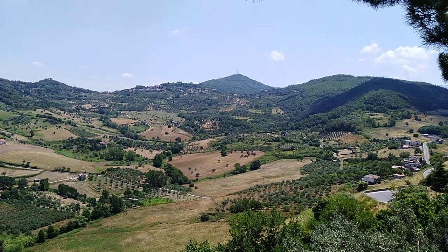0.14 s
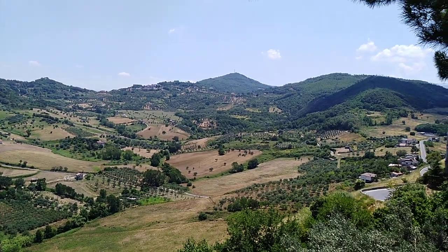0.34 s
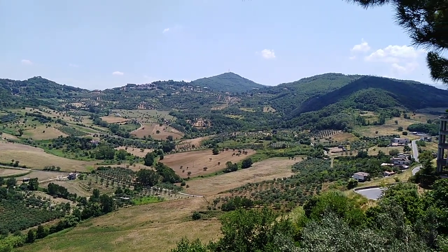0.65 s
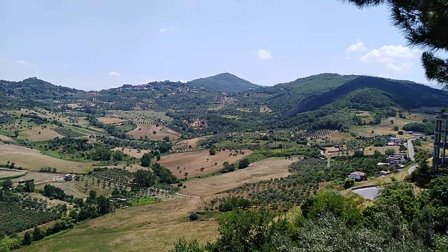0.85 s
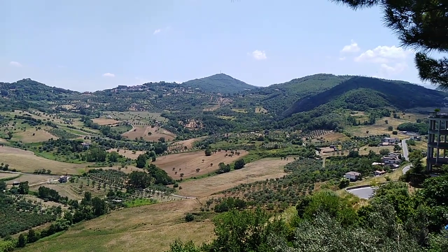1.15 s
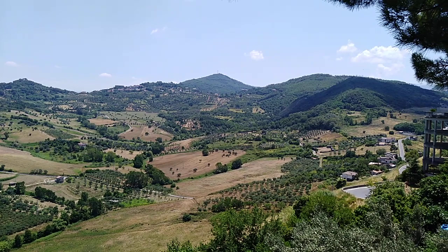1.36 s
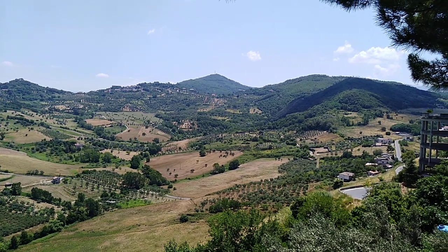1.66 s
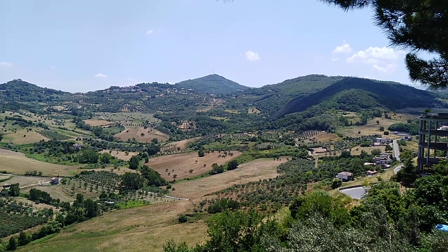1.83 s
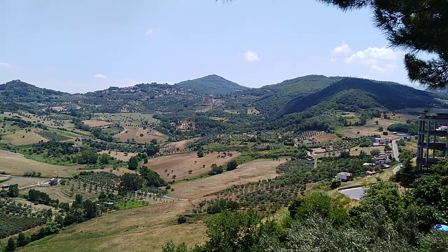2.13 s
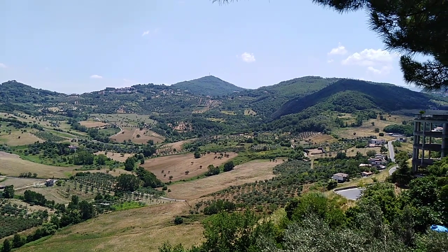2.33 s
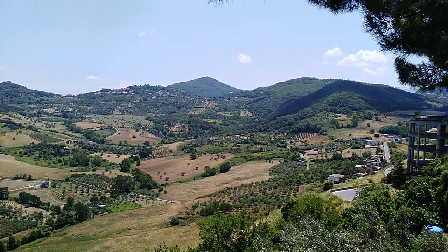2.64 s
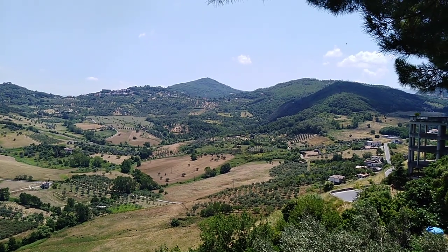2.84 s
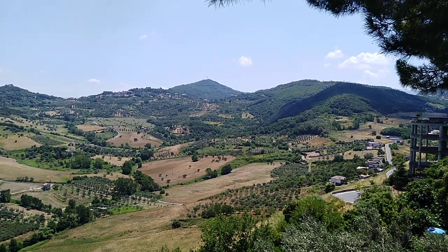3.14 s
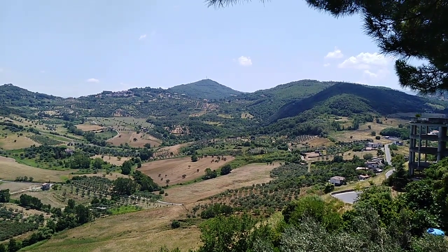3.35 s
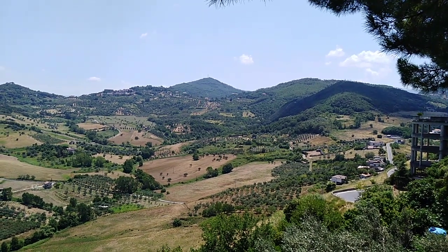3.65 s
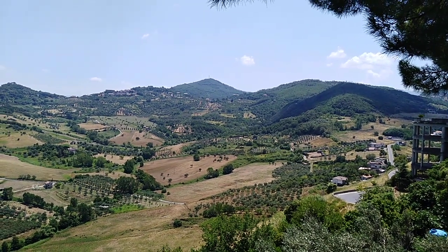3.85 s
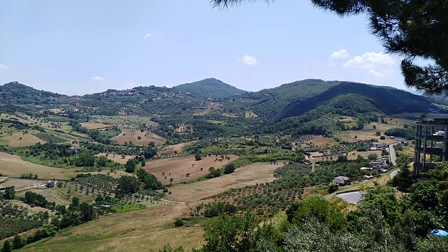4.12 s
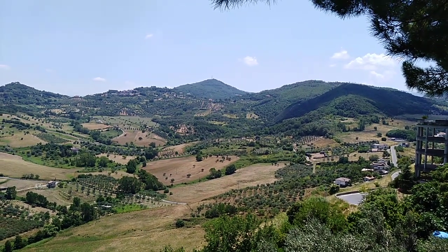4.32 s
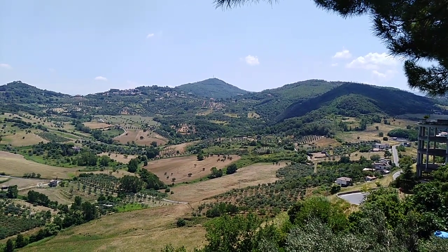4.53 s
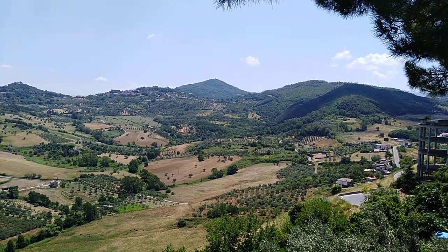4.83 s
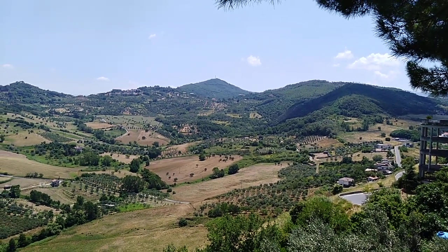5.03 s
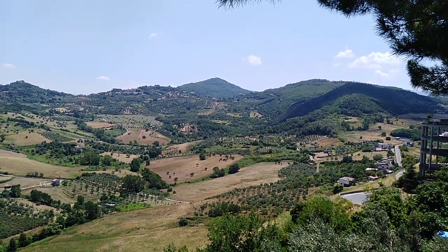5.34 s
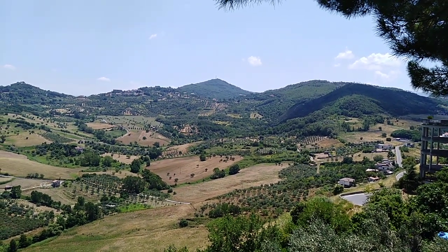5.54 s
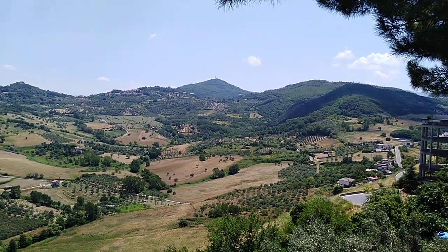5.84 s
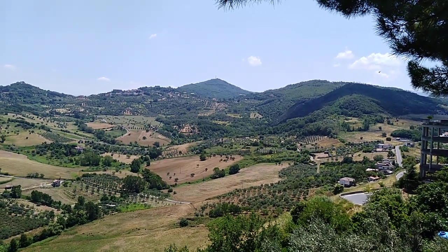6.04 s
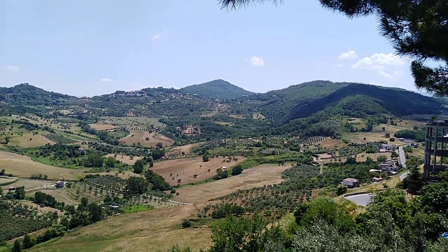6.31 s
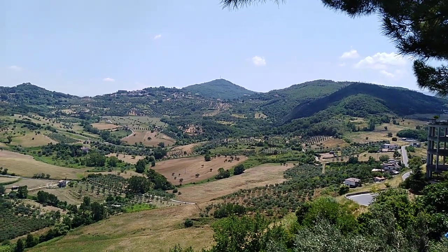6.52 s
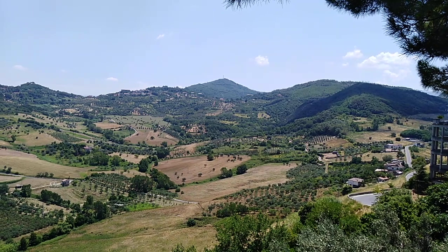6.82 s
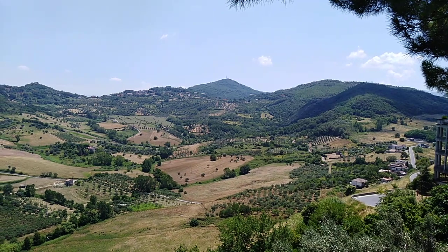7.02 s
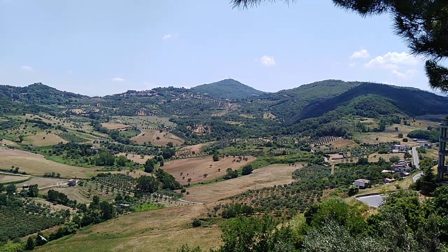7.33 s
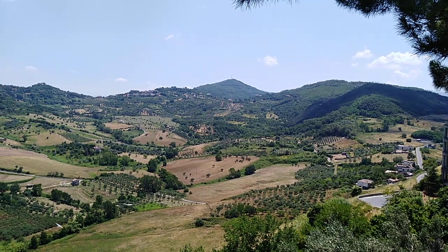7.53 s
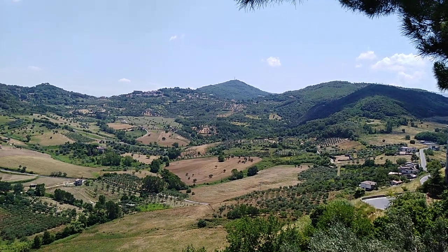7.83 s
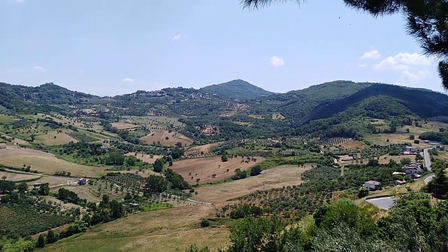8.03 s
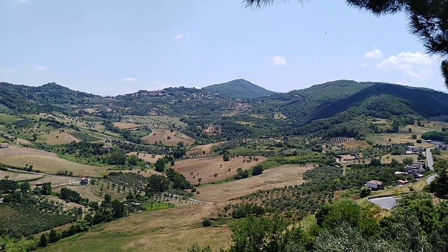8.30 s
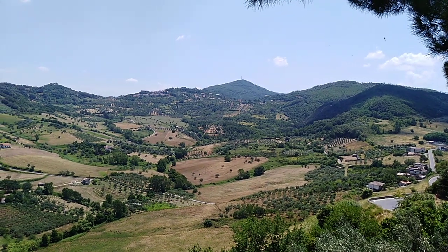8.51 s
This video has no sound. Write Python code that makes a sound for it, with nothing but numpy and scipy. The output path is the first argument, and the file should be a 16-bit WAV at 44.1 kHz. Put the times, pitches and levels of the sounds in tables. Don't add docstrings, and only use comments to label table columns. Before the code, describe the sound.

From 0 seconds a cicada very close on the right sings in bright, dry, rasping bursts, each a little over a tenth of a second, about six per second, with very short rests. A faint, blurred far chorus fills the gaps. Low wind rumble and soft thuds push on the microphone, mostly the right side, notably near 0, 1, 2.2 and 2.6 to 4.2 seconds. At about 3 seconds a second cicada begins weakly, and from 3.3 it sings steadily, slightly softer and rougher, its phrases swelling in and weaving against the first. From 4.5 seconds the wind settles to a faint rumble. The near singer leaves longer gaps or extends its buzzes around 5.5 to 7.3 seconds, then resumes regular pulsing. Faint distant wooden knocks appear near 0.5 and 1.9, with two heavier dull blows around 6.8 and 6.95 and lighter taps afterwards. The buzzing continues to the end at 8.7 seconds.

```python
import sys
import numpy as np
from scipy import signal
from scipy.fft import rfft, irfft
from scipy.io import wavfile
from scipy.ndimage import uniform_filter1d

SR = 44100
rng = np.random.default_rng(int(sys.argv[2]) if len(sys.argv) > 2 else 0)


def pcm_store(signal):
    levels = np.round(np.clip(np.atleast_2d(signal), -1, 1) * 32767)
    wavfile.write(sys.argv[1], SR, levels.astype(np.int16).T)


def nominal_scale(level):
    x = np.asarray(level, float) / 20
    return 10 ** x


N = 382347


def rms_one(x):
    return x / np.sqrt(np.mean(x ** 2, axis=-1, keepdims=True) + 1e-20)


def band(x, low_hz, high_hz, order=2):
    return signal.sosfilt(signal.butter(order, [low_hz, high_hz], "band", fs=SR, output="sos"), x)


def resonate(x, hz, width_hz):
    r = np.exp(-np.pi * width_hz / SR)
    section = [1, 0, -1, 1, -2 * r * np.cos(2 * np.pi * hz / SR), r * r]
    return signal.sosfilt([section, section], x + 1e-18)


def near_song():
    solo_starts = [.001, .13, .293, .453, .607, .769, .932, 1.086, 1.245, 1.408, 1.6, 1.773, 1.951, 2.12,
                   2.247, 2.519, 2.7, 2.891, 3.066, 3.253, 3.434]
    duet_starts = [3.607, 3.783, 3.957, 4.121, 4.301, 4.459, 4.647, 4.815, 4.989, 5.186, 5.368, 5.523,
                   5.871, 6.057, 6.621, 7.355, 7.55, 7.744, 7.924, 8.093, 8.264, 8.443, 8.63]
    # (time [s], rest [s])
    own_rests = [(.13, 0.057), (.293, 0.049), (.453, 0.046), (.607, .044), (.769, 0.058), (.932, .056),
                 (1.086, 0.056), (1.245, 0.055), (1.408, 0.054), (1.6, 0.048), (1.773, .053), (1.951, .056),
                 (2.12, .053), (2.247, .017), (2.519, .032), (2.7, .053), (2.891, .053), (3.066, .05),
                 (3.253, .042), (3.434, 0.063), (3.607, 0.064), (4.989, 0.059), (5.871, 0.033),
                 (6.057, 0.045), (6.621, 0.039), (7.355, 0.029), (7.55, .045), (7.744, 0.045),
                 (7.924, 0.047), (8.093, 0.038), (8.264, 0.04), (8.443, 0.032), (8.63, .05)]
    starts = np.concatenate([solo_starts, duet_starts, [N / SR + 0.085]])
    duet = starts >= duet_starts[0]
    rests = np.where(duet, 0.057, 0.053)
    for s, rest in own_rests:
        rests[np.argmin(np.abs(starts - s))] = rest
    lengths = np.diff(starts) - rests[1:]
    level_db = np.where(duet, -0.35, -0.5)
    return np.transpose([starts[:-1], lengths, level_db[:-1]])


def rib_clicks(song, pulls_per_s, rib_hz, wobble, uneven_db, warm_db=0):
    out, rib = np.zeros(N + SR), np.arange(8)
    for s, length, level_db in song:
        draws = rng.standard_normal((200, 18))
        pull = np.arange(max(int((length - 0.004) * pulls_per_s), 2))
        tension = 1 + 0.0044 * draws[-1, 0]
        draws = draws[:len(pull)]
        pace = pulls_per_s * (1 + 0.008 * draws[0, 0])
        jitter_s = 0.00006 * np.cumsum(draws[:, 0])
        start = s + pull / pace + 0.0028 * (pull > 0) + jitter_s
        side = (-1.) ** pull
        rib_rate = tension * rib_hz * (1 + 0.0073 * side)
        gaps = (1 - 0.024 * (rib - 3) + wobble * draws[:, 2:10]) / rib_rate[:, None]
        at = np.abs(start[:, None] + np.cumsum(gaps, axis=1) - gaps[:, :1]) * SR
        run_db = -1.8 * np.abs(rib - 1) + uneven_db * draws[:, 10:]
        pull_db = level_db - warm_db * np.exp(-pull / 2.1) + 0.11 * side + 0.098 * draws[:, 1]
        size = nominal_scale(run_db + pull_db[:, None])
        whole = at.astype(int)
        np.add.at(out, whole, size * (1 + whole - at))
        np.add.at(out, whole + 1, size * (at - whole))
    return out[:N]


def branches(clicks, scatter_db, t60):
    age = np.arange(SR // 8) / SR
    tails = rng.standard_normal((2, 2, len(age))) * nominal_scale(-60 * age / t60) * (1 - np.exp(-age / 0.0043))
    tails = nominal_scale(scatter_db)[:, None] * tails / np.linalg.norm(tails, axis=2, keepdims=True)
    sway = 2 * np.pi * 0.6965 * np.arange(N) / SR
    out = np.stack([np.roll(clicks, 10), clicks])
    for turn, tail in zip((np.sin, np.cos), tails):
        out = out + signal.oaconvolve((clicks * turn(sway))[None], tail, axes=1)[:, :N]
    return out


def body(drive, modes, duty):
    # (centre [Hz], width [Hz], depth [dB])
    shared_dips = [(2646, 43, -10.5), (3818, 144, -13.5), (9890, 380, -6.5), (11550, 170, -5.5)]
    hz, have = signal.welch(drive, SR, nperseg=1024)
    want = 1e-16
    for mode_hz, width_hz, right_db, left_db in modes:
        shape = 1 / (1 + (2 * (hz - mode_hz) / width_hz) ** 2) ** 2
        port_power = nominal_scale(2 * np.array([[right_db + left_db], [right_db]]))
        want = want + duty * port_power * shape / (shape.sum() * hz[1])
    for dip_hz, width_hz, depth_db in shared_dips:
        want = want * nominal_scale(2 * depth_db * np.exp(-((hz - dip_hz) / width_hz) ** 2))
    cepstrum = irfft(0.5 * np.log(want / (uniform_filter1d(have, size=3) + 1e-20)))
    cepstrum[:, 1:512] *= 2
    cepstrum[:, 513:] = 0
    return signal.oaconvolve(drive, irfft(np.exp(rfft(cepstrum))), axes=1)[:, :N]


def cicada(song, modes, pulls_per_s, rib_hz, wobble, scatter_db, t60, warm_db):
    clicks = rib_clicks(song, pulls_per_s, rib_hz, wobble, uneven_db=-0.5, warm_db=warm_db)
    duty = np.sum(np.array(song)[:, 1]) * SR / N
    return body(branches(clicks, scatter_db, t60), modes, duty)


def near_singer():
    # (centre [Hz], width [Hz], right level [dB], left minus right [dB])
    near_body = [(1914, 60, -67, -1.5), (2132, 95, -55, -7.5), (2384, 340, -51.5, -0.5),
                 (2810, 130, -50.5, -12), (3134, 370, -52.5, -5.5), (3698, 230, -59, -1),
                 (4690, 110, -46, -28), (4739, 240, -41, 4), (4888, 285, -29, -18), (5446, 630, -31, -10),
                 (6183, 390, -39, -11.5), (7067, 610, -35.5, -10), (7757, 310, -43.5, -10.5),
                 (8140, 1600, -47.5, -25), (9190, 340, -63.5, 1), (10050, 320, -54.5, -8.5),
                 (10320, 1200, -58.5, -7), (10750, 370, -56, -8.5), (11080, 240, -60.5, -8),
                 (11680, 200, -69, -12), (12610, 320, -62, -9.5)]
    return cicada(near_song(), near_body, pulls_per_s=221.3, rib_hz=2420, wobble=0.02,
                  scatter_db=[-1.5, -9.0], t60=0.07, warm_db=0.7)


def second_singer():
    # (time [s], length [s], level [dB])
    second_song = [(2.944, 0.3, -5.5), (3.025, 0.25, -9.5), (3.331, 0.165, 0), (3.592, 0.22, 0.5),
                   (3.871, 0.19, -0.5), (4.045, 0.14, 0.5), (4.238, 0.208, 1), (4.51, 0.212, -0.2),
                   (4.769, 0.156, 0.3), (4.985, 0.2, 0), (5.226, 0.16, 0.5), (5.456, 0.16, 1),
                   (5.685, 0.11, 0.2), (5.868, 0.15, 1), (6.08, 0.16, 0.5), (6.298, 0.137, 0.5),
                   (6.495, 0.152, 0), (6.689, 0.156, -0.5), (6.9, 0.12, 1), (7.068, 0.13, 0.5),
                   (7.258, 0.125, -0.5), (7.435, 0.142, -0.5), (7.627, 0.12, -0.5), (7.784, 0.138, -0.5),
                   (7.963, 0.137, -0.5), (8.148, 0.12, 0.5), (8.32, 0.12, -1.5), (8.5, 0.12, 0.5)]
    # (centre [Hz], width [Hz], right level [dB], left minus right [dB])
    second_body = [(1932, 290, -66, -5), (2085, 130, -57.5, 3.5), (2350, 330, -53.5, -2.5),
                   (2947, 570, -53, -8.5), (3870, 270, -77, 5), (4430, 97, -51, -11),
                   (4450, 490, -40.5, -2), (4650, 300, -36, -10.5), (5420, 790, -34, -9.5),
                   (6060, 250, -53, -7.5), (6690, 850, -38.5, -8.5), (7460, 610, -44.5, -35),
                   (8400, 580, -57.5, -6), (8960, 1100, -50, -21.5), (10460, 370, -68, 3),
                   (11480, 430, -65, -3.5), (12000, 500, -65.5, -4), (12800, 700, -65, -4),
                   (13280, 280, -70, -3)]
    return cicada(second_song, second_body, pulls_per_s=217, rib_hz=2288, wobble=0.037,
                  scatter_db=[-3.0, -5.0], t60=0.1, warm_db=6.5)


def far_chorus():
    # (time [s], level [dB])
    far_swell = [(0, -35.5), (.28, -40), (.43, -37), (.6, -37), (1.07, -35), (1.22, -38), (1.4, -39.5),
                 (1.58, -38.5), (1.94, -41), (2.1, -38.5), (2.68, -35), (2.87, -35.5), (3.24, -37.5),
                 (3.6, -33.5), (4.97, -35), (5.3, -35), (6.04, -37), (8.67, -32)]
    # (centre [Hz], width [Hz], right level [dB], left minus right [dB])
    far_body = [(2414, 320, -21.5, -10.5), (2800, 780, -24.5, -3.5), (4500, 170, -10, -14),
                (5000, 670, -3.5, -5.5), (5850, 1200, -6, -18.5), (5860, 440, -41, 16.5),
                (7300, 420, -11.5, -10.5), (7420, 1200, -11.5, -17), (9030, 680, -41, 6.5),
                (10400, 940, -31, -12), (12600, 490, -40, -3)]
    endless = [(s, 0.5, 0) for s in np.arange(0, N / SR, 0.5)]
    clicks = np.zeros(N)
    for pulls_per_s, rib_hz in [(214, 2380), (229, 2450)]:
        clicks += rib_clicks(endless, pulls_per_s, rib_hz, wobble=0.069, uneven_db=-3.5)
    swell_db = np.interp(np.arange(N) / SR, *np.transpose(far_swell))
    return nominal_scale(swell_db) * body(branches(clicks, [6.0, 3.0], t60=0.17), far_body, duty=0.58)


def on_ports(level_db, pan_db):
    share = nominal_scale(pan_db)
    return nominal_scale(level_db) * 2 * np.array([[share], [1]]) / np.sqrt(1 + share ** 2 + 0.17 * share)


def wind_strength():
    # (time [s], rumble [dB])
    steady_breeze = [(0, -64), (.9, -63), (1.7, -60.5), (2.5, -60), (3.4, -57), (4.3, -63.5), (5, -64),
                     (5.4, -65.5), (6.2, -66.5), (6.6, -67.5), (7.1, -69.5), (8.67, -70)]
    # (time [s], rumble [dB], flutter above it [dB], left minus right [dB])
    gust_crests = [(.05, -49, -7, -17), (0.221, -42, -33, -32), (.41, -51.5, -13, -11),
                   (.63, -51.5, -39, -23), (1.04, -49.5, -12, -15), (1.128, -47.5, -13, -23),
                   (1.28, -53.5, -30, -17), (1.44, -60, -10, -15), (1.62, -50.5, -14, -24),
                   (1.81, -47.5, -12, -24), (1.91, -49.5, -32, -19), (2.07, -50, -28, -25),
                   (2.222, -42, -45, -31), (2.32, -44, -36, -30), (2.581, -45.5, -29, -27),
                   (2.66, -47, -37, -9), (2.77, -44.5, -38, -1.5), (2.899, -44.5, -29, -1),
                   (3.041, -41, -20, -9), (3.11, -46.5, -23, 5), (3.237, -40, -22, -9),
                   (3.473, -42.5, -39, -14), (3.64, -44, -39, -11), (3.766, -41, -29, -24),
                   (3.94, -42, -31, -11), (4.03, -48, -35, 5), (4.15, -46.5, -35, -10),
                   (4.49, -55.5, -33, -24), (5.72, -58.5, -30, -18), (5.9, -57.5, -17, -20),
                   (6.36, -73, -1, -10), (7.6, -64, -9, -10), (7.22, -55, -18, 17)]
    rise_db_per_s, fall_db_per_s = 234, 200
    t = np.arange(0, N / SR, 0.002)
    breeze_db = np.interp(t, *np.transpose(steady_breeze))
    rumble = on_ports(breeze_db, pan_db=-3) ** 2
    flutter = rumble * nominal_scale(2 * -31)
    for s, crest_db, flutter_db, pan_db in gust_crests:
        loss_db = np.where(t < s, rise_db_per_s * (s - t), fall_db_per_s * (t - s))
        power = on_ports(crest_db - loss_db, pan_db) ** 2
        rumble = rumble + power
        flutter = flutter + power * nominal_scale(2 * flutter_db)
    now = np.arange(N) / SR
    return [np.array([np.interp(now, t, np.sqrt(port)) for port in layer]) for layer in (rumble, flutter)]


def wind():
    rumble_gain, flutter_gain = wind_strength()
    white = rng.standard_normal((2, N)) + 0.71 * rng.standard_normal(N)
    lumps = nominal_scale(2.9 * rms_one(band(rng.standard_normal((2, N)), 10.5, 25.0, order=1)))
    rumble = rms_one(band(band(white, 57.3, 122.2), 49, 90.7, order=1))
    flutter = rms_one(band(band(white, 120, 230), 110, 260)) * nominal_scale(-5)
    gusts = nominal_scale(0.2) * lumps * (rumble_gain * rumble + flutter_gain * flutter)
    return signal.sosfilt(signal.butter(8, 215, fs=SR, output="sos"), band(gusts, 42, 2000))


def thumps():
    # (time [s], peak [dB], left minus right [dB])
    gust_fronts = [(0.043, -40, -45), (0.204, -60, -34), (1.032, -37.5, -30), (1.127, -42, -26),
                   (1.783, -55, -18), (2.581, -59, -18.0), (3.035, -48.5, -20.5), (3.181, -47, -13),
                   (3.255, -47, -19), (3.688, -52, -41), (4.116, -67, -14.0), (7.196, -63.5, 11.5)]

    def push(x):
        return band(band(x, 69, 190, order=3), 65, 410, order=3)

    pushes = np.zeros((2, N))
    for s, peak_db, pan_db in gust_fronts:
        pushes[:, round(s * SR)] = nominal_scale(peak_db + 4.5 + np.array([pan_db, 0]))
    single = push(np.eye(1, 4000)[0])
    return push(pushes + 1e-18) / np.max(np.abs(single))


def knocks():
    # (time [s], peak [dB], centre [Hz], t60 [s])
    wood_modes = [(.48, -67, 620, .2), (.49, -68, 800, .2), (1.87, -63, 480, .2), (1.88, -70, 600, .15),
                  (6.65, -67, 815, .23), (6.64, -62, 1690, .25), (6.72, -67, 1520, .2),
                  (6.817, -60, 362, .3), (6.808, -62, 580, .25), (6.806, -60, 700, .25),
                  (6.802, -55, 824, .3), (6.808, -57, 940, .25), (6.806, -58, 1100, .25),
                  (6.806, -53, 1290, .3), (6.806, -58, 1500, .25), (6.94, -60, 260, .25),
                  (6.94, -63, 350, .45), (6.94, -60, 430, .12), (7.06, -68, 330, .5), (6.94, -60, 540, .12),
                  (6.94, -60, 630, .12), (6.938, -56, 740, .2), (6.938, -54, 900, .3),
                  (6.935, -62, 1240, .35), (7.18, -62, 335, .35), (7.22, -73, 1390, .4),
                  (7.31, -71, 1400, .3), (7.4, -70, 1490, .5), (7.548, -56, 1330, .3),
                  (8.18, -70, 1400, .3), (8.26, -70, 785, .2), (8.33, -70, 1070, .2), (8.47, -72, 700, .2),
                  (8.54, -65, 1080, .35)]
    out, age = np.zeros((2, N + SR)), np.arange(SR // 2) / SR
    for s, peak_db, hz, t60 in wood_modes:
        width = 0.1 if 6.79 < s < 7.0 else 0.045
        noise = rng.standard_normal(len(age)) + 0.41 * rng.standard_normal((2, len(age)))
        noise[0] = np.roll(noise[1], round(0.0004 * SR)) + 0.84 * noise[0]
        shape = nominal_scale(peak_db - 7.0 - 60 * age / max(t60, 0.1)) * (1 - np.exp(-age / 0.0042)) ** 2
        first = round(s * SR)
        out[:, first:first + len(age)] += shape * rms_one(resonate(noise, hz, width * hz))
    return out[:, :N]


def hiss():
    # (frequency [Hz], density [dB per Hz])
    faint_noise = [(150, -30), (280, 0), (600, -1), (900, -4), (1500, -8), (1800, -16), (2300, -40),
                   (4000, -120)]
    hz = np.arange(N // 2 + 1) * SR / N + 1e-3
    points_hz, points_db = np.transpose(faint_noise)
    colour = nominal_scale(np.interp(np.log(hz), np.log(points_hz), points_db))
    return nominal_scale(-87) * rms_one(irfft(rfft(rng.standard_normal((2, N))) * colour, N))


def attack_bursts():
    # (time [s], level [dB])
    bursts = [(.001, -65), (.13, -80), (.46, -78), (.29, -72), (.62, -75), (1.41, -78), (1.61, -74),
              (1.78, -75), (1.955, -75), (2.12, -77), (2.89, -74), (3.254, -74), (5.875, -82), (6.06, -85)]
    t = np.arange(N) / SR
    shape = sum(nominal_scale(level_db) * np.exp(-((t - s) / 0.0064) ** 2) for s, level_db in bursts)
    noise = rng.standard_normal(N) + 0.5 * rng.standard_normal((2, N))
    return shape * rms_one(band(noise, 300, 1800))


def mute_faint_bands(x, size):
    # (frequency [Hz], level [dB])
    silence_line = [(300, -110), (600, -103), (900, -101), (1600, -99), (1750, -78), (1950, -68), (2200, -67),
                    (2400, -73), (2630, -67), (2900, -73), (3400, -69), (3750, -63), (3950, -61), (5000, -70),
                    (8400, -66), (8800, -63), (9200, -68), (9700, -64), (10000, -69), (10700, -71),
                    (11250, -71), (11500, -67), (11900, -67), (12300, -72), (12900, -72), (13400, -71),
                    (14000, -76)]
    hz, _, frames = signal.stft(x, SR, nperseg=2048, noverlap=1024)
    power = np.abs(frames[:, :1024]) ** 2
    bands = power.reshape(2, -1, size, power.shape[-1]).sum(axis=2)
    centre = hz[:1024].reshape(-1, size).mean(axis=1)
    line_hz, line_db = np.transpose(silence_line)
    line_db = np.interp(np.log(centre), np.log(line_hz), line_db)
    frame_db = 10 * np.log10(bands.sum(axis=(0, 1)) + 1e-12)
    waver_db = 10 * uniform_filter1d(rng.standard_normal(bands.shape), size=4)
    line_db = line_db[:, None] + (frame_db + 26) + waver_db
    above_db = np.maximum(10 * np.log10(bands + 1e-14) - line_db, 0)
    stumble_db = 6.5 * np.exp(-above_db / 11) * uniform_filter1d(rng.standard_normal(bands.shape), size=2)
    keep = (above_db > 0) * nominal_scale(stumble_db)
    frames[:, :1024] *= np.repeat(np.maximum(keep, 0.003), size, axis=1)
    return signal.istft(frames, SR, nperseg=2048, noverlap=1024)[1][:, :N]


def scene():
    singers = near_singer() + second_singer() + far_chorus()
    insects = band(singers, 2116, 13500, order=7)
    return insects + wind() + thumps() + knocks()


def roll_off(x):
    return signal.sosfilt(signal.butter(12, 14390, fs=SR, output="sos"), x)


def record(dry):
    upper = signal.sosfilt(signal.butter(8, 280, "high", fs=SR, output="sos"), dry + hiss())
    bass = signal.sosfilt(signal.butter(8, 280, "low", fs=SR, output="sos"), dry)
    mix = mute_faint_bands(upper, size=8) + bass + attack_bursts() + nominal_scale(-23) * hiss()
    return roll_off(mix)


dry = scene()
out = record(dry)
pcm_store(out)
```